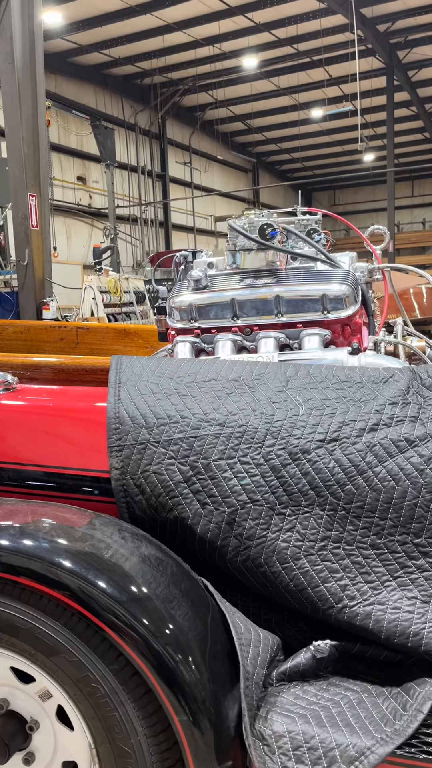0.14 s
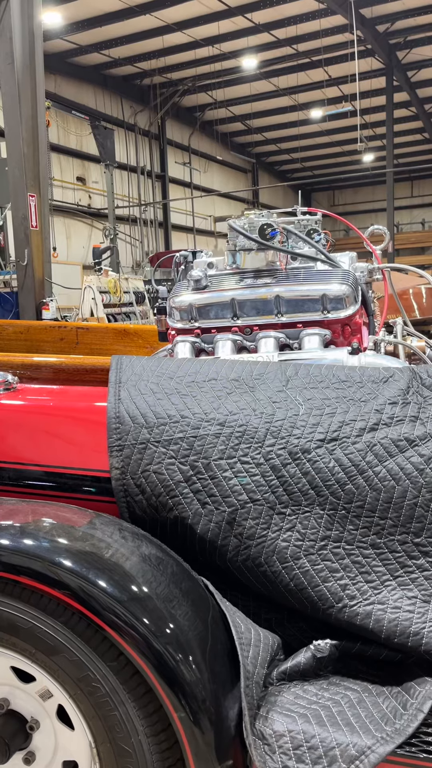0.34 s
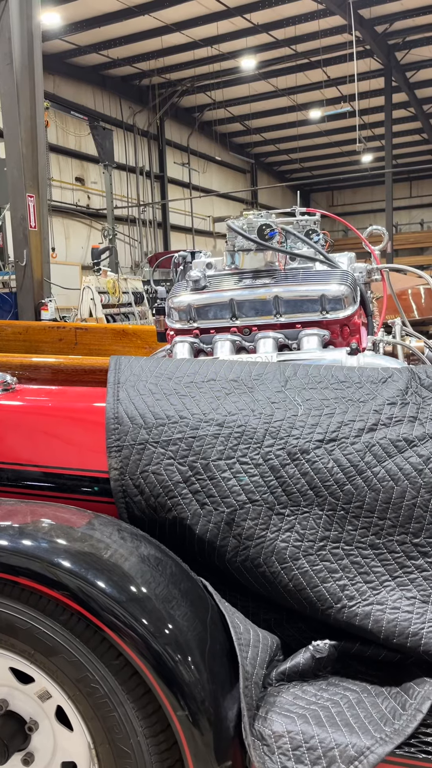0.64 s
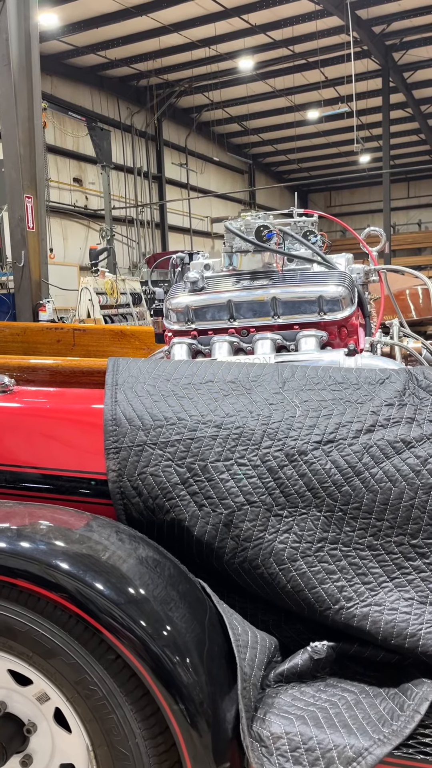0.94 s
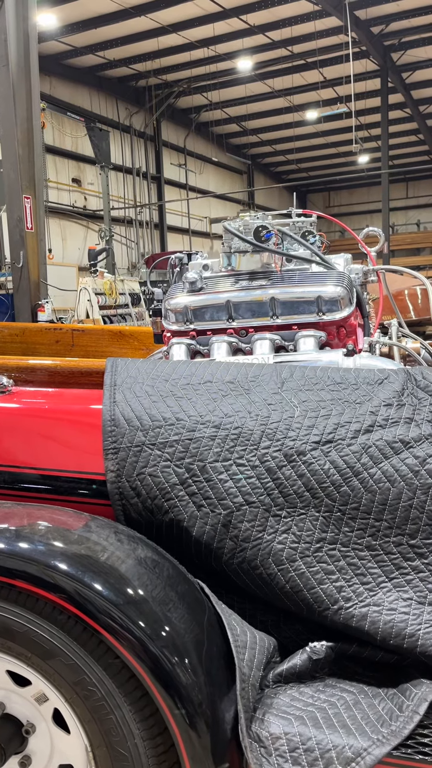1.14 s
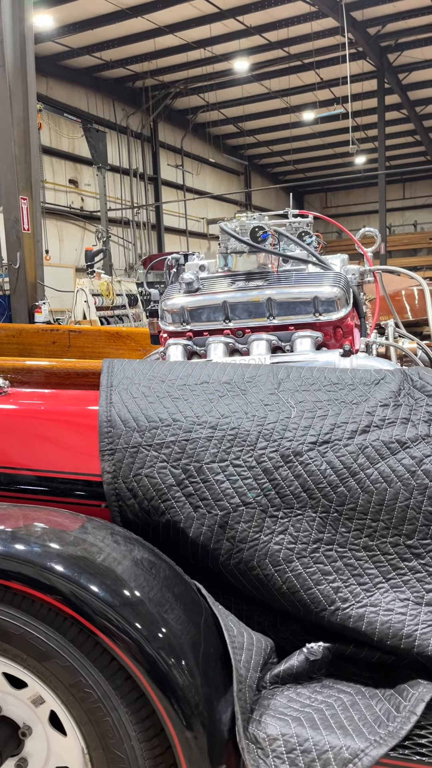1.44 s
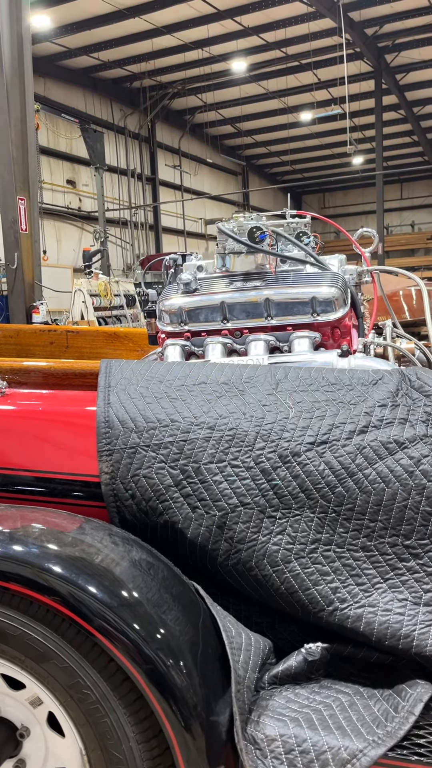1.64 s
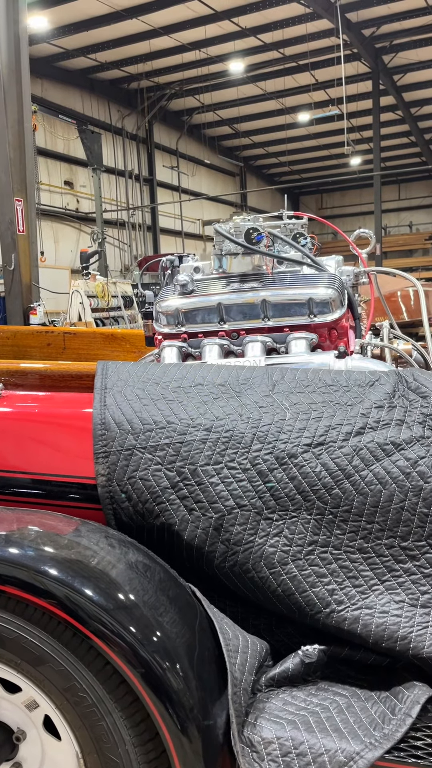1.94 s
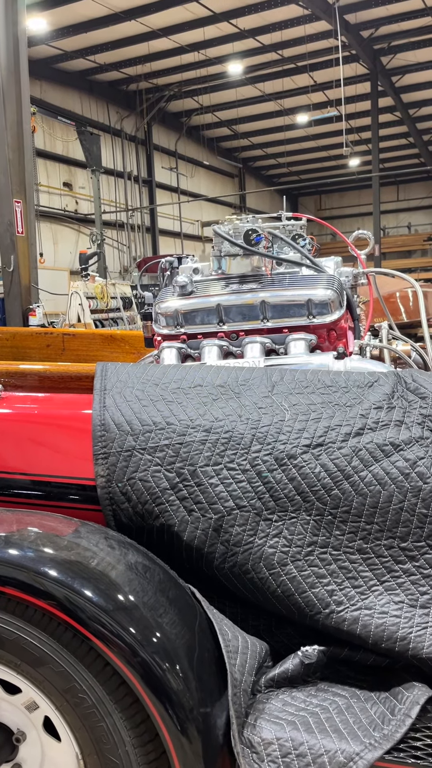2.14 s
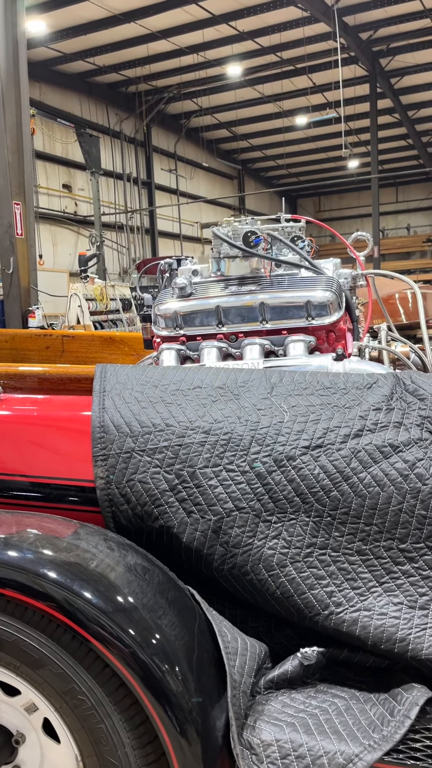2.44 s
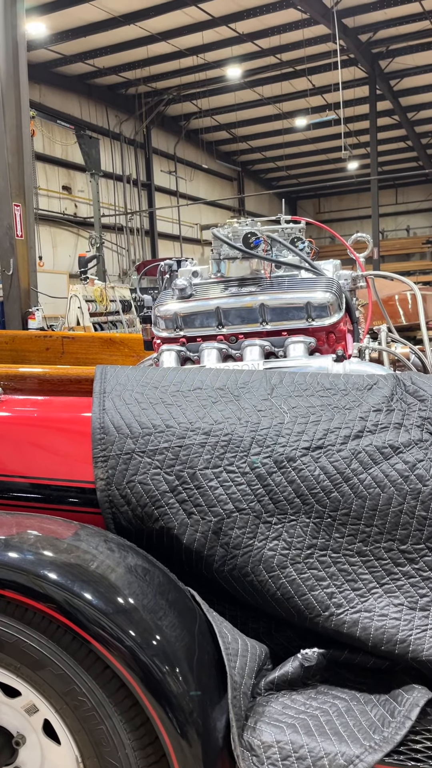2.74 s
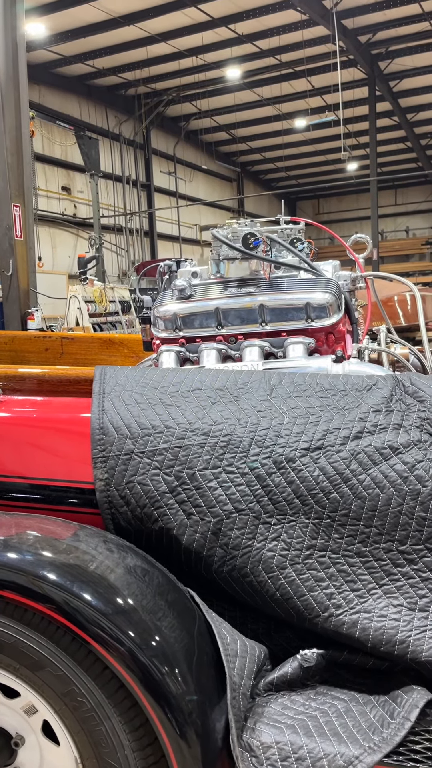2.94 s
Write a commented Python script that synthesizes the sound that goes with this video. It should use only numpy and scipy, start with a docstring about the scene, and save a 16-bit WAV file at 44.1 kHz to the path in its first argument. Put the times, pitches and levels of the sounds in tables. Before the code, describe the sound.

A rough V8 with open headers starts loud, with rapid irregular raspy cracks, low thumps, a boom near 75 Hz, roar and gas hiss. From about 0.4 s it slowly weakens; after 1 s firings spread apart, and from 1.5 to 2.5 s only weak, sparse chugs remain, almost stalling. At 2.6 s sharp cracks return, crowding together and swelling to full roar by 3 s. Close microphone, large reverberant shop.

```python
"""A V8 with open headers runs unevenly in a large shop: it slows almost to a stall, then picks up again.
Steady hiss and a low roar of shaped noise lie under it, sinking towards the near-stall and coming back.
From the start the exhaust booms as one wavering tone near 75 Hz; each firing cracks out of the headers
as ringing pipe tones with a noisy rattle and a puff of hiss, and low modes thump near 200 Hz.
Cracks and thumps leave a tail in the shop; of two microphone ports, the left hears the treble first."""
import sys
import numpy as np
from scipy import signal
from scipy.fft import rfft, irfft
from scipy.io import wavfile
from scipy.ndimage import uniform_filter1d

SR = 44100
rng = np.random.default_rng(int(sys.argv[2]) if len(sys.argv) > 2 else 0)


def store_pcm(level_fs):
    """Save levels as 16-bit WAV."""
    pcm = np.round(np.clip(level_fs, -1, 1) * 32767).astype(np.int16)
    wavfile.write(sys.argv[1], SR, np.atleast_2d(pcm).T)


N = 136710

# Firings that crack. Each row: peak in seconds, level in dB, centre of the colour in Hz.
CRACK_TIMES = [(0.014, -14.5, 1230), (0.024, -14, 880), (0.039, -14, 1000), (0.063, -11.5, 945),
               (0.088, -15.5, 844), (0.103, -12, 970), (0.143, -16, 1310), (0.153, -13.5, 1140),
               (0.17, -10.5, 754), (0.208, -15, 1000), (0.235, -14.5, 750), (0.274, -17, 1200),
               (0.283, -19.5, 940), (0.298, -13.5, 1070), (0.35, -12.5, 940), (0.364, -14, 1160),
               (0.409, -21.5, 1407), (0.417, -18, 980), (0.436, -14.5, 826), (0.476, -27, 1110),
               (0.486, -15.5, 1170), (0.503, -21.5, 1000), (0.511, -17, 940), (0.545, -20, 1500),
               (0.555, -17, 905), (0.568, -14.5, 680), (0.619, -23, 1260), (0.627, -17, 913),
               (0.653, -16.5, 850), (0.692, -22, 1300), (0.7, -17.5, 950), (0.718, -16.5, 1000),
               (0.775, -18, 877), (0.785, -17, 870), (0.843, -20.5, 1310), (0.853, -17.5, 907),
               (0.872, -16.5, 890), (0.933, -17, 1210), (0.95, -20, 815), (1.005, -32, 910),
               (1.016, -16, 935), (1.103, -18.5, 870), (1.125, -19.5, 1040), (1.184, -22.5, 980),
               (1.194, -18, 768), (1.293, -27, 1020), (1.314, -19, 1040), (1.395, -20, 980),
               (1.538, -29.5, 880), (1.645, -21, 1340), (1.68, -23, 1200), (1.791, -25, 1010),
               (1.799, -31, 932), (1.94, -47, 1100), (1.971, -27, 1317), (2.014, -27.5, 890),
               (2.155, -31, 895), (2.18, -26.5, 1285), (2.225, -21.5, 1000), (2.355, -52, 1100),
               (2.389, -28.5, 1530), (2.533, -31, 944), (2.592, -20.5, 1160), (2.616, -16, 1230),
               (2.655, -15.5, 1100), (2.711, -15.5, 1160), (2.752, -19.5, 1160), (2.766, -18, 796),
               (2.798, -15, 1050), (2.848, -15.5, 1300), (2.881, -15.5, 1040), (2.895, -15.5, 828),
               (2.921, -13, 1059), (2.963, -15, 960), (2.991, -15, 820), (3.001, -11, 900),
               (3.025, -14, 1080), (3.058, -13, 890), (3.091, -13, 930)]
# Backgrounds under the firings. Each row: time in seconds, steady hiss in dB, roar in dB,
# tilt of all the hiss in dB per octave.
BACKGROUND = [(0, -30, -12, 0.6), (1.001, -52, -23, 0.5), (1.801, -55, -38, -1), (2.56, -50, -39.5, 1.3),
              (2.615, -35, -27.5, 1), (2.8, -36, -25, 1.5), (3.1, -31, -14, 1)]


def amp(db):
    """Gain of a level in dB."""
    return 10 ** (np.asarray(db) / 20)


def evened(x):
    """The signal scaled to an RMS of 1."""
    return x / np.sqrt(np.mean(x ** 2) + 1e-20)


def read(points, hz):
    """Value of a curve over frequency, read between its points on a log scale."""
    f, value = np.transpose(points)
    return np.interp(np.log(hz + 1), np.log(f + 1), value)


def add(mix, start_s, sound):
    """Lay a sound into the mix, trimmed at both ends of it."""
    at = round(start_s * SR)
    sound = sound[max(-at, 0):]
    part = mix[max(at, 0):][:len(sound)]
    part += sound[:len(part)]


def coloured(points, count):
    """Two unrelated noises with the given spectrum, at an RMS of 1."""
    hz = np.fft.rfftfreq(count, 1 / SR)
    spectrum = rfft(rng.standard_normal((2, count))) * amp(read(points, hz))
    return evened(irfft(spectrum, count))


def swell(t, rise, fall):
    """Soft rise to a peak of 1 at three rise times, then exponential fall."""
    rising = np.exp(-(t / rise - 3) ** 2 / 2)
    falling = np.exp(-(t - 3 * rise) / fall)
    return np.where(t < 3 * rise, rising, falling)


def along(column):
    """Gain of one background over time."""
    rows = np.array(BACKGROUND)
    return amp(np.interp(np.arange(N) / SR, rows[:, 0], rows[:, column]))


def puffs(level_db, fall_s):
    """Power of escaping gas: rises quickly at every crack, then falls."""
    RISE_S = 0.002
    FOLLOW = 0.67  # dB of puff per dB of crack
    t, power = np.arange(12000) / SR, np.zeros(N)
    for peak_s, db, _ in CRACK_TIMES:
        puff = amp(level_db + FOLLOW * db) * swell(t, RISE_S, fall_s)
        add(power, peak_s - 3 * RISE_S, puff ** 2)
    return power


def patchy(pair):
    """Turbulent gas: small patches of time and pitch swell and sink, and a tilt over time sets brightness."""
    PATCHY_DB, PIVOT_HZ = 2.5, 4040
    hz, t, z = signal.stft(pair, SR, nperseg=256)
    lumps = rng.standard_normal(z.shape[1:])
    lumps = uniform_filter1d(lumps, size=2, axis=0)  # across pitch
    lumps = evened(uniform_filter1d(lumps, size=8, axis=1))  # across time
    rows = np.array(BACKGROUND)
    tilt = np.interp(t, rows[:, 0], rows[:, -1])
    octaves = np.log2((hz[:, None] + 1) / PIVOT_HZ)
    gain = amp(PATCHY_DB * lumps + octaves * tilt)
    return signal.istft(z * gain, SR, nperseg=256)[1][:, :N]


def hiss():
    """Exhaust gas hisses all along and puffs up after every crack; the bright fizz dies first."""
    # Spectrum of the hiss. Each row: frequency in Hz, relative level in dB per Hz.
    hiss_spectrum = [(1200, -3.5), (2200, -3), (5000, -6), (9000, -13), (14000, -19.5)]
    # Spectrum of the brighter fizz. Each row: frequency in Hz, relative level in dB per Hz.
    fizz_spectrum = [(2000, -37), (5000, -3), (9000, -4.5), (14000, -11.5)]
    HISS_DB, HISS_FALL_S = -25.5, 0.084  # puff level for a crack at 0 dB
    FIZZ_DB, FIZZ_FALL_S = -29.5, 0.016
    FLICKER_DB = 1.2
    slow_power = puffs(HISS_DB, HISS_FALL_S) + along(column=1) ** 2
    wander = evened(uniform_filter1d(rng.standard_normal(N), size=200))
    flicker = amp(FLICKER_DB * wander)
    slow = np.sqrt(slow_power) * coloured(hiss_spectrum, N)
    fizz = np.sqrt(puffs(FIZZ_DB, FIZZ_FALL_S)) * coloured(fizz_spectrum, N)
    return patchy(flicker * (slow + fizz))


def roar():
    """The wash of engine noise under and between the firings: shaped noise that follows its background level."""
    # Spectrum of the roar. Each row: frequency in Hz, relative level in dB per Hz.
    roar_spectrum = [(30, -11), (60, -6.5), (110, -5), (250, -15.5), (400, -16.5), (1000, -27),
                     (2000, -35.5), (4000, -63), (15800, -84)]
    return along(column=2) * coloured(roar_spectrum, N)


def boom():
    """One wavering low tone with its octave, swelling and fading; its pitch moves from swell to swell."""
    # Swells of the exhaust boom. Each row: peak in seconds, half width in seconds, level in dB, pitch in Hz.
    swells = [(0.011, 0.014, -15, 77), (0.069, 0.07, -11, 78), (0.127, 0.011, -13, 80),
              (0.162, 0.011, -11, 82), (0.19, 0.014, -9, 79), (0.243, 0.03, -11, 80),
              (0.295, 0.011, -13, 85), (0.322, 0.016, -12, 78), (0.361, 0.013, -11, 82),
              (0.388, 0.014, -11, 77), (0.448, 0.031, -10, 78), (0.522, 0.027, -11, 76),
              (0.598, 0.016, -13, 76), (0.662, 0.03, -11, 77), (0.742, 0.024, -14, 75),
              (0.793, 0.014, -14, 89), (0.882, 0.03, -13, 79), (0.95, 0.013, -14, 82),
              (0.984, 0.015, -21, 76), (1.031, 0.02, -12, 81), (1.146, 0.028, -13, 83),
              (1.212, 0.014, -15, 79), (1.251, 0.03, -19, 84), (1.337, 0.034, -12, 81),
              (1.441, 0.035, -18, 74), (1.517, 0.014, -24, 67), (1.576, 0.038, -16, 76),
              (1.706, 0.064, -23, 70), (1.785, 0.011, -25, 78), (1.826, 0.018, -19, 69),
              (1.909, 0.024, -32, 71), (2.019, 0.048, -22, 69), (2.183, 0.028, -24, 72),
              (2.246, 0.038, -25, 70), (2.435, 0.062, -25, 66), (2.564, 0.02, -24, 68),
              (2.609, 0.013, -17, 77), (2.668, 0.033, -15, 77), (2.773, 0.051, -14, 71),
              (2.838, 0.019, -18, 74), (2.874, 0.015, -11, 74), (2.927, 0.032, -10, 74),
              (3.016, 0.042, -10, 78), (3.086, 0.015, -13, 88)]
    OCTAVE_DB = -24
    WAVER = 0.009  # RMS share of the pitch
    t = np.arange(N) / SR
    peak_s, width_s, db, hz = np.transpose(swells)
    level = sum(amp(d) * np.exp(-((t - p) / w) ** 2) for p, w, d in zip(peak_s, width_s, db))
    waver = 1 + WAVER * evened(uniform_filter1d(rng.standard_normal(N), size=900))
    cycles = np.cumsum(np.interp(t, peak_s, hz) * waver) / SR
    phase = 2 * np.pi * (cycles + rng.random())
    tone = np.sin(phase) + amp(OCTAVE_DB) * np.cos(2 * phase)
    return np.sqrt(2) * level * tone


def cracks():
    """Each firing briefly rings the header pipes near its centre, with a noisy rattle and a slap echo."""
    # Pipe resonances. Each row: frequency in Hz, width in Hz (heard in the rattle), level in dB.
    pipe_modes = [(518.7, 79, 4.5), (695, 260, 2.5), (971, 820, -1), (1470, 2800, 0), (1690, 49, -1),
                  (2273, 500, -4.5)]
    RISE_S, FALL_S, RATTLE_FALL_S = 0.0017, 0.003, 0.021
    STAGGER_S, DETUNE = 0.0013, 0.071  # the pipes do not speak quite together; spread of their pitch
    RATTLE_DB = -9.5
    SLAP_S, SLAP_DB = 0.011, -14  # nearby echo
    COLOUR_OCT, WIDE = 0.5, 0.15  # spread about the centre; share of colour outside it
    LEAD_S, LEAD_BELOW_DB, LEAD_SPAN_DB = 0.006, -17, 6  # in weak firings the rattle starts early
    t, hz, out = np.arange(4096) / SR, np.fft.rfftfreq(4096, 1 / SR), np.zeros(N)
    f, width, mode_db = np.transpose(pipe_modes)
    pipes = (amp(mode_db) / (1 + ((hz[:, None] - f) / (width / 2)) ** 2)).sum(axis=1)
    luck = rng.uniform(-1, 1, (len(CRACK_TIMES), 3, len(f)))
    gases = rng.standard_normal((len(CRACK_TIMES), 4096))
    near_peak = slice(round(2 * RISE_S * SR), round(4 * RISE_S * SR) + 40)

    def colour(at_hz, centre):
        """Weight of a frequency: a bell around the centre on a floor."""
        return np.exp(-(np.log2((at_hz + 1) / centre) / COLOUR_OCT) ** 2 / 2) + WIDE

    for (peak_s, db, centre), gas, (tune, phase, late) in zip(CRACK_TIMES, gases, luck):
        tones = np.cos(2 * np.pi * np.outer(t, f * (1 + DETUNE * tune)) + np.pi * phase)
        swells = swell(t[:, None] - STAGGER_S * late, RISE_S, FALL_S)
        ring = tones * swells @ (amp(mode_db) * colour(f, centre))
        ring /= np.sqrt(np.mean(ring[near_peak] ** 2))
        rattle = evened(irfft(rfft(gas) * pipes * colour(hz, centre)))
        rattle = rattle * swell(t, RISE_S, RATTLE_FALL_S)
        start_s = peak_s - 3 * RISE_S
        lead_s = LEAD_S * np.clip((LEAD_BELOW_DB - db) / LEAD_SPAN_DB, 0, 1)
        add(out, start_s, amp(db) * ring)
        add(out, start_s - lead_s, amp(db + RATTLE_DB) * rattle)
        add(out, start_s + SLAP_S, amp(db + SLAP_DB) * ring)
    return out


def thumps():
    """Each thump rings the same few low modes, a little detuned; loud ones ring higher and shorter."""
    # Low thumps. Each row: peak in seconds, level in dB.
    thump_times = [(0.03, -9.5), (0.076, -7.5), (0.099, -8.5), (0.162, -6.5), (0.192, -10), (0.225, -16),
                   (0.288, -8.5), (0.356, -10), (0.425, -6), (0.493, -7), (0.564, -8), (0.635, -14),
                   (0.71, -9), (0.781, -13.5), (0.858, -9), (0.939, -14), (1.019, -13.5), (1.132, -11.5),
                   (1.202, -19), (1.239, -15.5), (1.322, -16.5), (1.365, -22), (1.429, -17.5), (1.517, -25),
                   (1.67, -22), (1.796, -19.5), (1.98, -22), (2.049, -27), (2.216, -31), (2.403, -28.5),
                   (2.676, -20), (2.776, -15.5), (2.807, -17.5), (2.866, -15), (2.941, -11), (3.009, -12.5),
                   (3.036, -10.5)]
    # Modes as the softest thump rings them, before chance. Each row: frequency in Hz, level in dB,
    # time to fall 60 dB in seconds.
    low_modes = [(138, -5, 0.3), (186, 9, 0.55), (236, 6, 0.35), (310, 0, 0.35)]
    RISE_S = 0.0059
    SPREAD_DB, DETUNE = 3.5, 0.011  # chance in level and pitch of each mode
    LOUD_RISE, LOUD_DAMP = 0.0029, 0.077  # per dB above the softest: pitch share up, ring shorter
    t, out = np.arange(9000) / SR, np.zeros(N)
    luck = rng.uniform(-1, 1, (len(thump_times), len(low_modes), 2))
    softest = min(db for _, db in thump_times)
    for (peak_s, db), chances in zip(thump_times, luck):
        lift = 1 + LOUD_RISE * (db - softest)
        damp = 1 + LOUD_DAMP * (db - softest)
        ring = np.zeros(len(t))
        for (f, mode_db, t60), (tune, loud) in zip(low_modes, chances):
            hz = f * lift * (1 + DETUNE * tune)
            envelope = swell(t, RISE_S, t60 / damp / np.log(1000))
            tone = np.sin(2 * np.pi * hz * (t - 3 * RISE_S))
            ring += amp(mode_db + SPREAD_DB * loud) * envelope * tone
        add(out, peak_s - 3 * RISE_S, amp(db) * ring / abs(ring).max())
    return out


def shop(x):
    """The room: two unrelated tails of sparse taps, each band dying at its own speed."""
    # Decay of the shop. Each row: frequency in Hz, time to fall 60 dB in seconds.
    decay = [(100, 2.65), (500, 0.69), (2000, 0.2), (8000, 1.43)]
    SHOP_DB, GAP_S = -12, 0.011  # level of the tail, wait before its first tap
    taps = np.zeros((2, SR))
    slots = np.arange(round(GAP_S * SR), SR - 20, 20)  # one tap somewhere in every 20 samples
    places = slots + rng.integers(0, 20, (2, len(slots)))
    signs = rng.choice([-1., 1.], (2, len(slots)))
    np.put_along_axis(taps, places, signs, 1)
    hz, t, z = signal.stft(taps, SR, nperseg=256)
    fade = amp(-60 * t / read(decay, hz)[:, None])
    tail = signal.istft(z * fade, SR, nperseg=256)[1]
    tail = tail / np.linalg.norm(tail[0])
    return amp(SHOP_DB) * signal.fftconvolve(x[None], tail, axes=1)[:, :N]


def ports(pair):
    """The left port hears the first signal; the right hears it shifted in phase, mixed with the second."""
    # Likeness of the ports. Each row: frequency in Hz, left-right likeness from 0 to 1.
    likeness = [(60, 1), (300, .95), (800, .88), (1600, .85), (2800, .55), (4300, .2), (6000, .85),
                (14000, .9)]
    # Phase below the treble. Each row: frequency in Hz, lead of the left port in radians.
    low_lead = [(0, 0), (600, -.5), (1400, -.4), (2000, .5), (3000, 2.8), (5000, 1.5)]
    TREBLE_FROM_HZ = 5000
    IN_STEP_HZ, TURN_HZ = 3850, 4330  # the treble line crosses zero lead here, gains a turn every TURN_HZ
    hz, (first, second) = np.fft.rfftfreq(N, 1 / SR), rfft(pair)
    same = np.clip(read(likeness, hz), 0, 1)
    treble_lead = 2 * np.pi * (hz - IN_STEP_HZ) / TURN_HZ
    lead = np.where(hz < TREBLE_FROM_HZ, np.interp(hz, *np.transpose(low_lead)), treble_lead)
    right = same * first * np.exp(-1j * lead) + np.sqrt(1 - same ** 2) * second
    return irfft([first, right], N)


def scene():
    """Engine and room at the ports; boom and thumps reach the pair through the first signal alone."""
    low = thumps()
    bangs = np.array([cracks(), cracks()])  # same firings, separate chance
    room = shop(bangs[0] + low)
    bass = np.array([low + boom(), np.zeros(N)])
    return ports(bangs + room + hiss() + roar() + bass)


def record(dry):
    """The microphone drops the deepest bass and rounds off the loudest peaks; then the band limit."""
    BASS_CUT_HZ, EDGE_HZ = 42, 14000
    CEILING = 0.95  # full scale is 1
    high_pass = signal.butter(3, BASS_CUT_HZ, "high", fs=SR, output="sos")
    cut = signal.sosfilt(high_pass, dry)
    soft = cut / (1 + (cut / CEILING) ** 4) ** .25
    low_pass = signal.firwin(511, EDGE_HZ, window=("kaiser", 9), fs=SR)
    return signal.oaconvolve(soft, low_pass[None], "same")


dry = scene()
out = record(dry)
store_pcm(out)
```